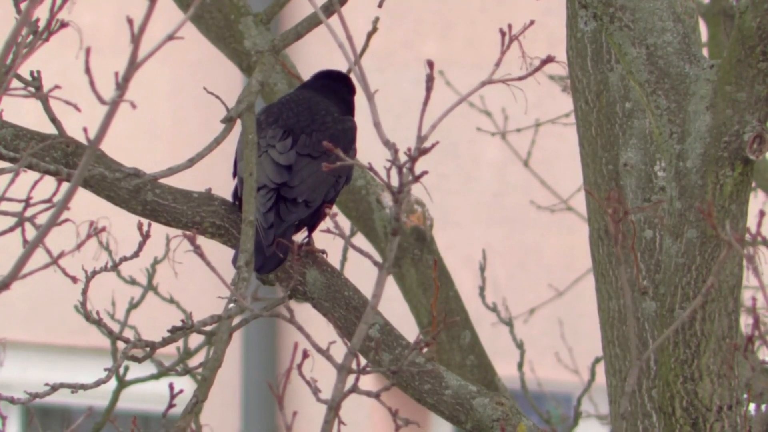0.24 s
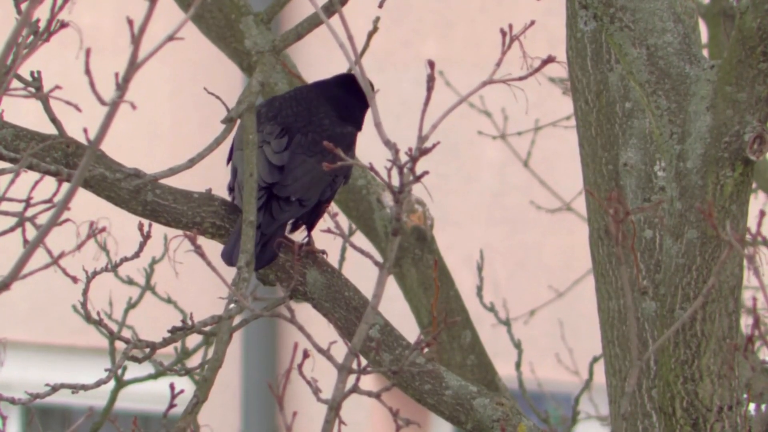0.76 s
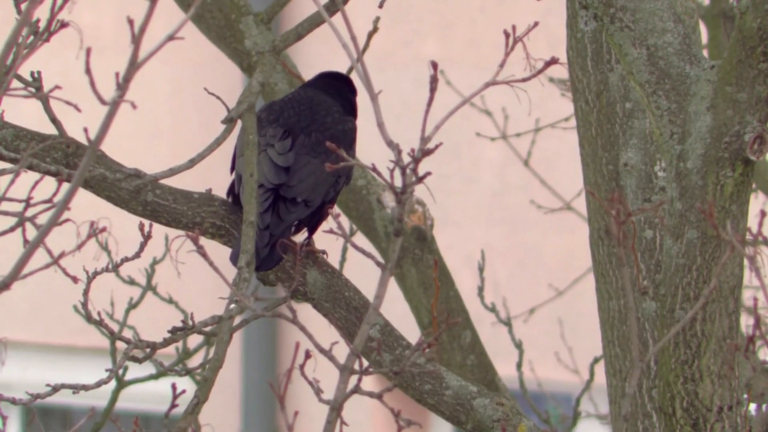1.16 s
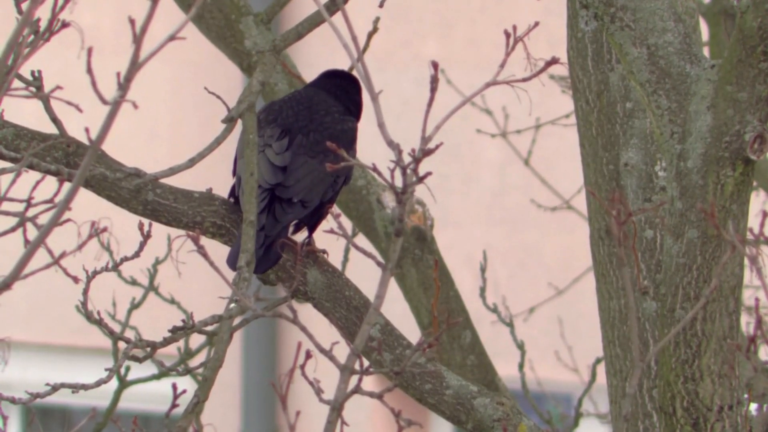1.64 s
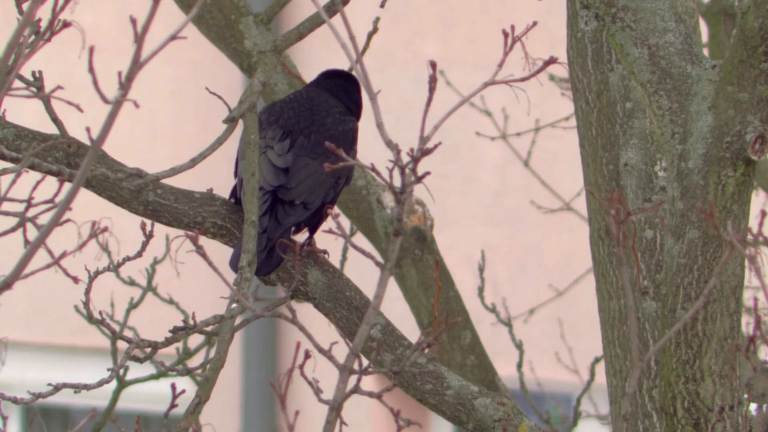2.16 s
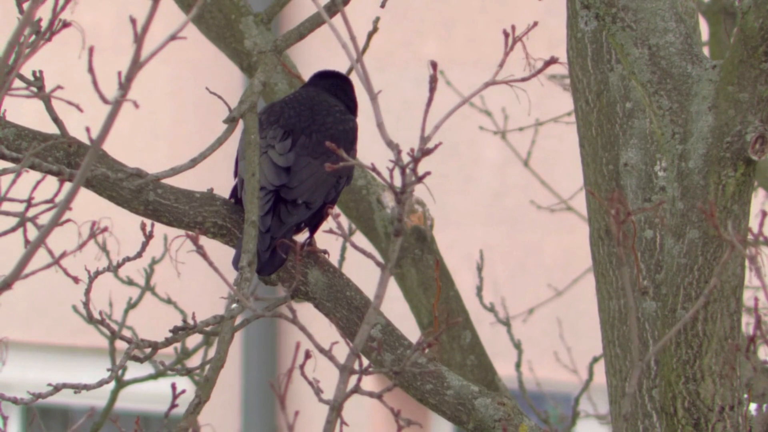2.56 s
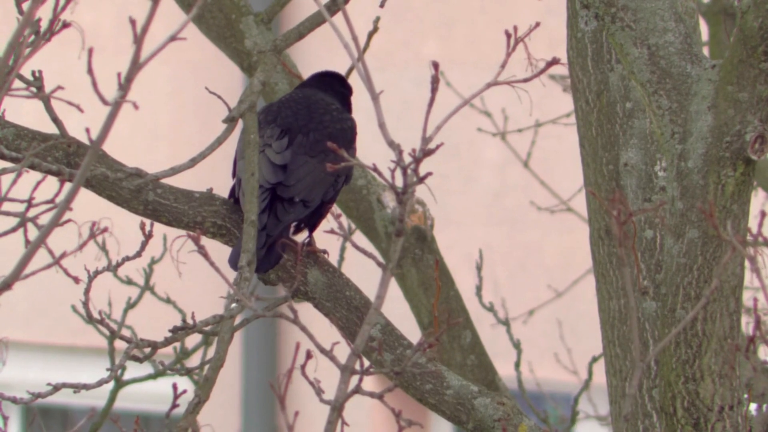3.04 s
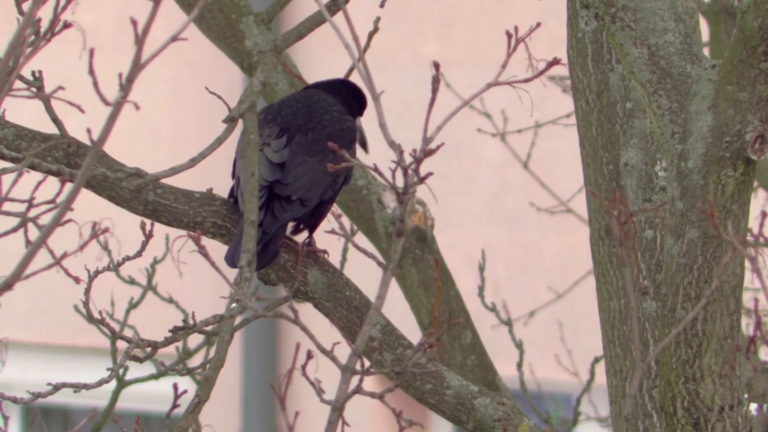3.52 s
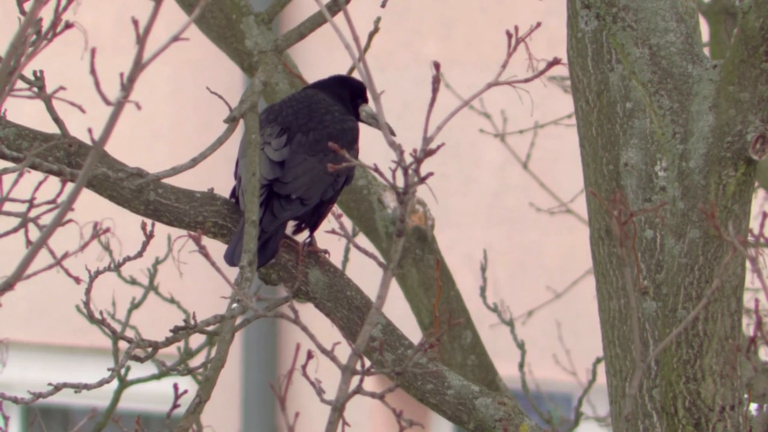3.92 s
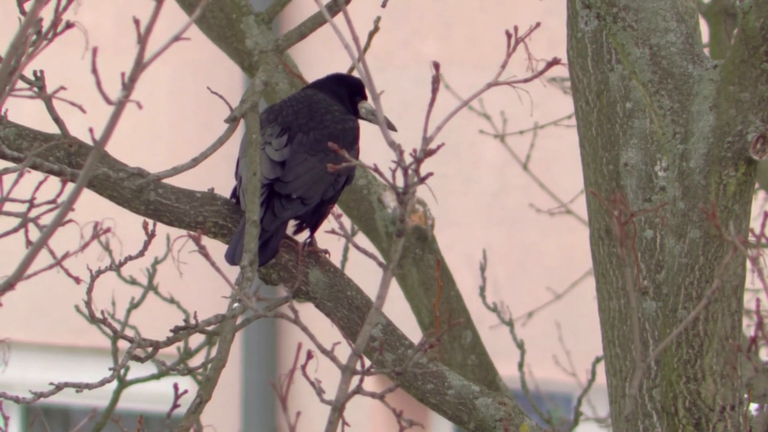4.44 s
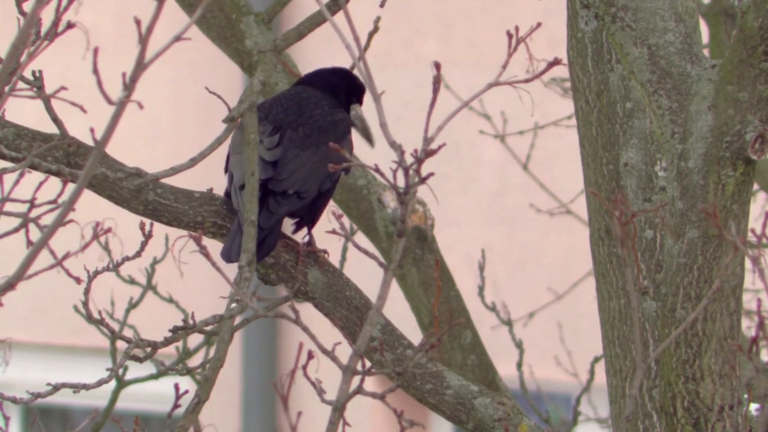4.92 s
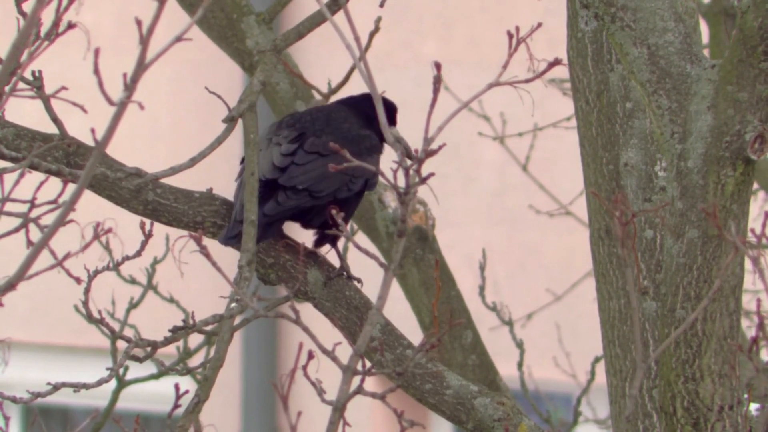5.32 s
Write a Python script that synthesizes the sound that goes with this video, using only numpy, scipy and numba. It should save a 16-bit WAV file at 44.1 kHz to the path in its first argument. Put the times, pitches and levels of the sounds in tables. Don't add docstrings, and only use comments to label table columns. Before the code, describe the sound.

A quiet outdoor place between house walls, with a low to middle, dull hum of far traffic running steadily throughout, broad and slightly wavering. Around 0.2 to 0.8 s a few very faint bird chirps and a thin whistle pass in the distance. At 1.4 s a crow a short way off caws loudly: a harsh, nasal, rattling cry with a fast throb, swelling quickly, then sagging in pitch and ending near 1.8 s. A second caw, with a more abrupt onset and slightly shorter, runs from 2.0 to 2.4 s. Both are bright and raspy, a little crunched by microphone overload, and leave a long, faint echo from the walls. A small buzzy bird call follows at 2.55 s. Dry, close twig ticks snap at about 3.3 s and twice near 3.6 s. Sparse faint chirps continue to the end at about 5.5 s, with a faint low hoot near 5.2 s.

```python
import sys
import numpy as np
from scipy import signal
from scipy.io import wavfile
from scipy.ndimage import uniform_filter1d
from numba import njit

SR = 44100
rng = np.random.default_rng(int(sys.argv[2]) if len(sys.argv) > 2 else 0)


def gain_from_decibels(decibels):
    exponent = np.asarray(decibels, float) / 20
    return 10 ** exponent


def store_pcm(level_fs):
    pcm = np.round(np.clip(level_fs, -1, 1) * 32767).astype(np.int16)
    wavfile.write(sys.argv[1], SR, np.atleast_2d(pcm).T)


N = 246078

# frequency in Hz, density in dB per Hz.
TRAFFIC_COLOUR = [(12, -54), (20, -39), (90, -9), (180, -10.5), (306, -5), (465, -8), (746, -1.5),
                  (811, -3), (1270, -4), (1380, -5.5), (2920, -27), (3750, -28), (6360, -35.5), (7730, -37),
                  (15500, -46)]
# frequency in Hz, likeness from 0 to 1.
LEFT_RIGHT_LIKENESS = [(60, 0.99), (180, 0.98), (550, 0.98), (1650, 0.93), (4970, 0.266), (15000, 0.29)]
TRAFFIC_DB = -44.5

# start in seconds, length in seconds, from Hz, to Hz, level in dB.
CHIRPS = [(.22, 0.042, 4440, 3900, -69), (.28, 0.047, 5300, 4200, -69), (.31, .06, 4660, 3800, -65),
          (2.79, 0.031, 4280, 3900, -64), (3.58, 0.081, 3800, 3760, -63), (4.16, .035, 4200, 4080, -61.5),
          (4.189, 0.068, 3770, 3040, -58.5), (4.64, .04, 3500, 3450, -68), (4.722, .04, 4800, 5000, -69),
          (5.23, .04, 4900, 5000, -69), (5.284, 0.064, 4370, 3170, -68)]
# start in seconds, length in
# seconds, from Hz, to Hz, level in dB.
WHISTLES = [
    (0.564, 0.23, 2710, 2660, -65),
    (3.29, 0.17, 3000, 2990, -66),
    (5.17, .17, 209, 225, -56.5),
]
# start in seconds, length in seconds, from Hz, to Hz, level in dB.
BUZZES = [
    (2.55, 0.055, 4200, 3940, -55.5),
    (3.457, .04, 4800, 4800, -67),
    (3.79, .1, 4740, 5000, -61),
    (4.364, 0.044, 4640, 4840, -64),
    (5.02, .04, 5000, 4900, -68),
]
WHISTLE_WARBLE_HZ, CHIRP_WARBLE_HZ, BUZZ_WARBLE_HZ = 8, 111, 320

# time in seconds, resting pitch in Hz, effort in dB,
# mouth opening from 0 to 1, throat resonance in Hz.
FIRST_CAW = [
    (1.423, 331, -28, 0.2, 1130),
    (1.455, 399, -12.5, 0.41, 1270),
    (1.495, 440, -7.5, 0.57, 1415),
    (1.525, 406, -6.5, 0.76, 1340),
    (1.58, 399.3, -5, 0.9, 1370),
    (1.63, 351.3, -7.5, 0.82, 1224),
    (1.69, 323.9, -11, 0.82, 1220),
    (1.745, 326.7, -10.5, 0.6, 1400),
    (1.8, 282.8, -23, 0.5, 1400),
]
SECOND_CAW = [
    (2.028, 344, -35.5, 0.15, 1300),
    (2.065, 343.5, -8.5, 0.62, 1340),
    (2.095, 427.6, -4.5, 0.6, 1450),
    (2.135, 418.5, -8, 0.78, 1260),
    (2.17, 376.3, -6, 0.8, 1380),
    (2.22, 387.8, -6, 0.86, 1420),
    (2.28, 349.8, -8.5, 0.64, 1400),
    (2.325, 320, -14.5, 0.36, 1300),
    (2.362, 273, -25, 0.057, 1450),
]
# start in seconds, pitch reached in Hz; the last row ends the caw.
FIRST_THROBS = [(1.423, 350), (1.438, 370), (1.458, 447), (1.474, 513), (1.499, 495), (1.516, 440),
                (1.539, 424), (1.56, 439), (1.581, 417), (1.603, 406), (1.63, 427), (1.658, 388),
                (1.682, 375), (1.707, 390), (1.732, 365), (1.762, 318), (1.774, 296), (1.8, 280)]
SECOND_THROBS = [(2.028, 350), (2.043, 400), (2.065, 454), (2.088, 521), (2.104, 484), (2.126, 452),
                 (2.148, 450), (2.162, 419), (2.183, 435), (2.208, 452), (2.231, 417), (2.253, 392),
                 (2.279, 382), (2.308, 368), (2.331, 285), (2.362, 270)]
# centre in Hz, width in Hz, level in dB.
BEAK_MODES = [(2077, 170, 4.5)]
# centre in Hz, width in Hz, level in dB.
UPPER_MODES = [(2344, 97, -1.5), (2973, 150, 3.5), (3450, 150, -9)]
# centre in Hz, width in Hz, level in dB.
RASP_MODES = [(3900, 720, -3), (4430, 340, -3), (5020, 63, 3.5), (5440, 120, 2), (6160, 230, 5)]
# centre in Hz, width in Hz, level in dB.
SIZZLE_MODES = [(7300, 67, 2.5), (6690, 770, 3), (8280, 85, 5), (8860, 330, -1.5), (10600, 1700, -8.5),
                (13700, 3500, -13)]

CLIMB_SHARE = .65
CLEAR_DB, CLEAREST, ROUGHER_PER_DB, ROUGHEST = -7, .08, .045, .5
THROAT_WIDTH_HZ, CHEST_CUT_HZ, CHEST_DB = 696, 350, -35.5
# dB with the mouth wide open, dB lost when shut.
BEAK_LAW, UPPER_LAW = (5.8, 33.4), (-2.13, 16.7)
RASP_LAW, SIZZLE_LAW = (-24.5, 13.6), (-19.5, 21.6)
RASP_GROWS_DB_PER_S = 25.5
GAP_DB, STUTTER_DB, STUTTER_S = -4.5, -22.5, 0.031

# band centre in Hz, level in dB, decay by 60 dB in seconds.
WALLS = [(497, -26, 0.67), (1130, -18.5, 1.74), (1827, -20, 1.63), (3060, -20.5, 1.45), (5000, -19.5, 0.58),
         (9000, -44, 0.293)]
NEAR_DB, NEAR_T60_S, SIDE_DB, SIDE_FROM_HZ = -11, 0.073, 3.5, 3970

# time in seconds, peak in dB, ring in Hz, treble in dB, decay by 60 dB in milliseconds.
TWIGS = [
    (3.268, -50, 3340, -3, 14),
    (3.2892, -27.5, 3393, -3, 21),
    (3.6133, -25.5, 3450, -16.5, 7.8),
    (3.6558, -23, 3610, -17.5, 11),
]


def rms_one(x):
    return x / np.sqrt(np.mean(x ** 2) + 1e-20)


def in_time(rows):
    s, *columns = np.transpose(rows)
    return [np.interp(np.arange(N) / SR, s, column) for column in columns]


def at_hz(points, hz):
    points_hz, values = np.transpose(points)
    return np.interp(np.log(hz), np.log(points_hz), values)


def drift(rate_hz, size=N):
    r = np.exp(-2 * np.pi * rate_hz / SR)
    noise = rng.standard_normal(size + SR // 4)
    settled = signal.lfilter([1], [1, -2 * r, r * r], noise)[SR // 4:]
    return rms_one(settled)


@njit
def resonate(x, turn, r):
    y = np.zeros(len(x))
    for i in range(2, len(x)):
        y[i] = (1 - r * r) / 2 * (x[i] - x[i - 2]) + 2 * r * np.cos(turn[i]) * y[i - 1] - r * r * y[i - 2]
    return y


def peak(x, hz, width_hz):
    turn = 2 * np.pi * hz / SR * np.ones(len(x))
    return resonate(x + 1e-18, turn, np.exp(-np.pi * width_hz / SR))


def peaks(x, modes):
    return sum((-1) ** k * gain_from_decibels(db) * peak(x, hz, width) for k, (hz, width, db) in enumerate(modes))


def band(x, low_hz, high_hz):
    sos = signal.butter(2, [low_hz, min(high_hz, .45 * SR)], "band", fs=SR, output="sos")
    return signal.sosfilt(sos, x)


def traffic(patchy_db=1.5):
    out = 0
    together = drift(1.5)
    edges = 20 * 2 ** np.arange(0, 10.1, .5)
    white = rng.standard_normal((2, 2, N))
    for k, (low, high) in enumerate(zip(edges, edges[1:])):
        mid, side = band(white[k % 2], low, high)
        hz = np.sqrt(low * high)
        alike = np.clip(at_hz(LEFT_RIGHT_LIKENESS, hz), -1, 1)
        flicker = 0.14 * together + np.roll(together, 9001 * k)
        gain = gain_from_decibels(at_hz(TRAFFIC_COLOUR, hz) + patchy_db * flicker)
        out = out + gain * (np.sqrt(1 + alike) * mid + np.sqrt(1 - alike) * side * [[1], [-1]])
    return gain_from_decibels(TRAFFIC_DB) * rms_one(out)


def far_birds():
    out = np.zeros(N)
    kinds = (WHISTLES, WHISTLE_WARBLE_HZ), (CHIRPS, CHIRP_WARBLE_HZ), (BUZZES, BUZZ_WARBLE_HZ)
    for calls, warble_hz in kinds:
        for s, length, from_hz, to_hz, db in calls:
            t = np.arange(int(length * SR))
            hz = np.linspace(from_hz, to_hz, len(t)) + warble_hz * drift(520, SR // 4)[:len(t)]
            swell = np.sin(np.pi * t / len(t)) ** 0.35
            tone = np.sin(2 * np.pi * np.cumsum(hz) / SR)
            out[int(s * SR):int(s * SR) + len(t)] += gain_from_decibels(db + 2.5) * swell * tone
    return out


def crow_voice(cycle, rough):
    size = len(cycle)
    order = np.arange(1, 33)[:, None]
    lag = np.where(order < 9, -.5 * order ** 2, 7 * rng.random(order.shape))
    waver = gain_from_decibels(1.2 * np.array([drift(35, SR // 2)[:size] for k in order]))
    pulses = rms_one(np.sum(waver * np.cos(2 * np.pi * order * cycle + lag), axis=0))
    pulse_number = np.floor(cycle + .5).astype(int)
    strength = gain_from_decibels(9.6 * rough * rng.standard_normal(400)[pulse_number])
    gate = (.5 + .5 * np.cos(2 * np.pi * cycle)) ** 2
    breath = rms_one(gate * rng.standard_normal(SR // 2)[:size])
    voice = np.sqrt(1 - .7 * rough) * pulses * strength + .55 * rough * breath
    return voice, breath, strength, waver[0]


def caw(controls, throbs):
    s, top_hz = np.transpose(throbs)
    first = int(s[0] * SR)
    t = np.arange(first, int((s[-1] + 0.023) * SR)) / SR
    rest_hz, level_db, opening, throat_hz = (c[first:first + len(t)] for c in in_time(controls))

    top = s + CLIMB_SHARE * np.diff(s, append=s[-1] + .005)
    low_hz = np.interp(s, t, rest_hz)
    pitch = np.interp(t, np.ravel([s, top], "F"), np.ravel([low_hz, top_hz], "F"))
    rough = np.clip(CLEAREST + ROUGHER_PER_DB * (CLEAR_DB - level_db), CLEAREST, ROUGHEST)
    jitter = .09 * rough * drift(130, SR // 2)[:len(t)]
    cycle = np.cumsum(pitch * (1 + jitter)) / SR
    voice, breath, strength, first_waver = crow_voice(cycle, rough)

    laws = (BEAK_LAW, UPPER_LAW, RASP_LAW, SIZZLE_LAW)
    beak_db, upper_db, rasp_db, sizzle_db = (open_db - shut_db * (1 - opening) for open_db, shut_db in laws)
    rasp_db = rasp_db + RASP_GROWS_DB_PER_S * (t - t[0])
    strain = np.interp(t, np.ravel([s, top - .006, top], "F"), np.tile([0, 0, 1], len(s)))
    beak_db, upper_db = beak_db - 6 * strain, upper_db - 6 * strain

    throat = peak(voice, throat_hz, .8 * THROAT_WIDTH_HZ) + .16 * voice
    body = peak(throat, throat_hz, 900)
    beak = peaks(voice, BEAK_MODES) + 0.14 * voice
    body = body - gain_from_decibels(beak_db) * peaks(beak, [(2105, 490, 0)])
    upper = peaks(peaks(voice, UPPER_MODES), [(2865, 1270, 0.0025)])
    body = band(body + gain_from_decibels(upper_db + 1.5) * upper, CHEST_CUT_HZ, 3380)
    body = body + gain_from_decibels(CHEST_DB) * first_waver ** 2.35 * strength * np.cos(2 * np.pi * cycle)
    slack = np.clip((350 - pitch) / 70, 0, 1)
    body = body + gain_from_decibels(CHEST_DB + 10.5) * slack * np.cos(4 * np.pi * cycle)
    hoarse = voice + .3 * breath
    body = body + gain_from_decibels(rasp_db) * band(peaks(hoarse, RASP_MODES), 3630, 5750)
    body = body + gain_from_decibels(sizzle_db) * band(peaks(hoarse, SIZZLE_MODES), 6660, 15440)

    body = body / np.sqrt(uniform_filter1d(body ** 2, size=800) + 1e-9)
    ends = np.append(s[1:], s[-1] + 0.016)
    corners = np.ravel([s, s + 0.00075, top, ends - .002], "F")
    closing = np.interp(t, corners, np.tile([1, 0, 0, 1], len(s)))
    gap_db = GAP_DB + STUTTER_DB * np.exp((t[0] - t) / STUTTER_S)
    fade = np.clip((t[-1] - t) / 0.046, 0, 1)
    out = np.zeros(N)
    out[first:first + len(t)] = body * gain_from_decibels(level_db + gap_db * closing) * fade
    return out


def street(x):
    t = np.arange(3 * SR // 2) / SR
    mid, side = rng.standard_normal((2, len(t)))
    side = gain_from_decibels(SIDE_DB) * band(side, SIDE_FROM_HZ, 21900)
    near_fall = gain_from_decibels(NEAR_DB - 60 * t / NEAR_T60_S) * np.sqrt(14 / NEAR_T60_S / SR)
    echo = near_fall * np.array([mid + side, mid - side])
    wall_noise = np.array([mid + side / 4, mid - side / 4])
    for hz, db, t60 in WALLS:
        arrival = np.minimum(t / .03, 1)
        fall = gain_from_decibels(db - 60 * t / t60) * arrival * np.sqrt(14 / t60 / SR)
        echo += fall * band(wall_noise, hz / 1.45, hz * 1.45)
    return x + signal.fftconvolve(x[None], echo, axes=1)[:, :N]


def twig_ticks():
    out = np.zeros(N)
    t = np.arange(SR // 4) / SR
    for s, peak_db, hz, treble_db, t60_ms in TWIGS:
        fall = gain_from_decibels(-60000 * t / t60_ms)
        flutter = 0.51 * gain_from_decibels(-4000 * t) * np.cos(2 * np.pi * 260 * t)
        ring = np.sin(2 * np.pi * hz * t) * (fall + flutter)
        edge = np.sin(2 * np.pi * 6500 * t) + np.sin(2 * np.pi * 8600 * t) + 0.21 * np.sin(2 * np.pi * 10800 * t)
        knock = .5 * gain_from_decibels(-14000 * t) * np.sin(2 * np.pi * 2700 * t)
        wave = ring + knock + gain_from_decibels(treble_db) * edge * gain_from_decibels(-16000 * t)
        start = round(s * SR)
        out[start:start + len(t)] += gain_from_decibels(peak_db) * wave * np.minimum(t / .0008, 1)
    return out


def scene():
    crow = caw(FIRST_CAW, FIRST_THROBS) + caw(SECOND_CAW, SECOND_THROBS)
    return street(crow + twig_ticks() + far_birds()) + traffic()


def low_pass(x):
    return signal.sosfilt(signal.butter(12, 15650, fs=SR, output="sos"), x)


def record(dry):
    top = .93
    bent = dry + 0.01 * dry ** 2 * np.minimum(dry ** 2, 1)
    flat = bent / (1 + np.abs(bent / top) ** 6) ** (1 / 6)
    return low_pass(flat)


dry = scene()
out = record(dry)
store_pcm(out)
```